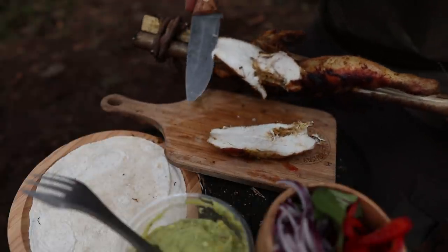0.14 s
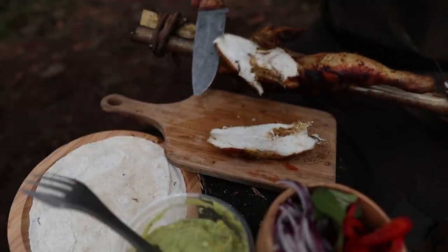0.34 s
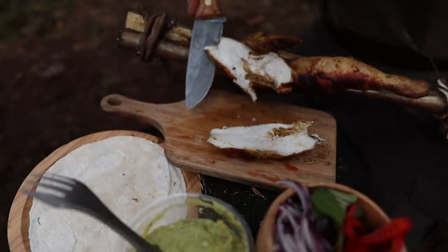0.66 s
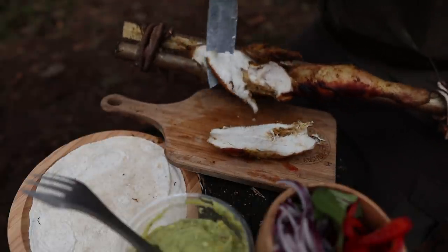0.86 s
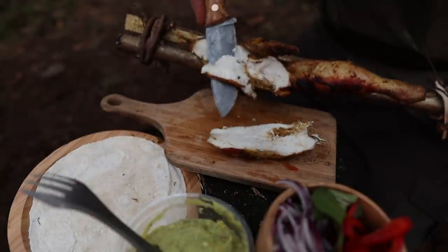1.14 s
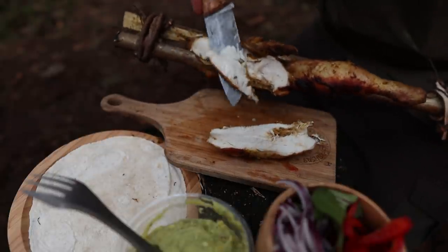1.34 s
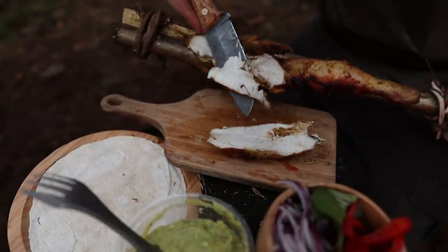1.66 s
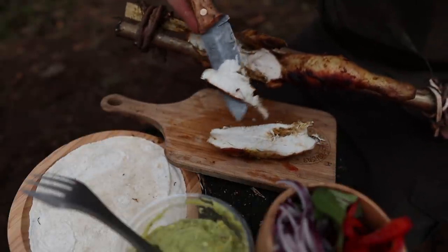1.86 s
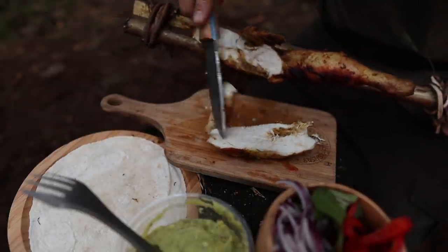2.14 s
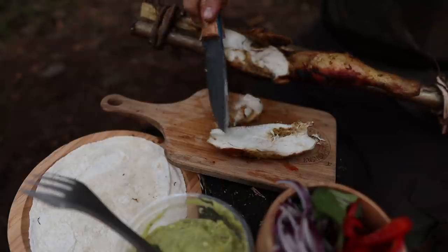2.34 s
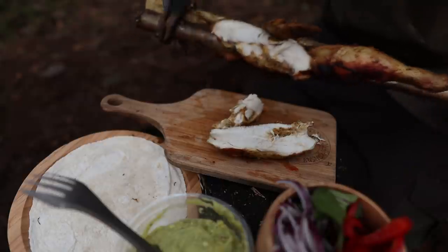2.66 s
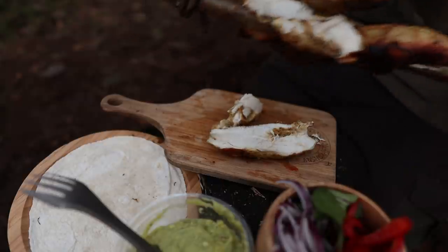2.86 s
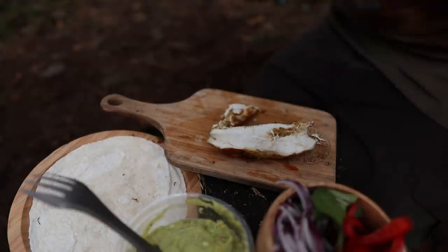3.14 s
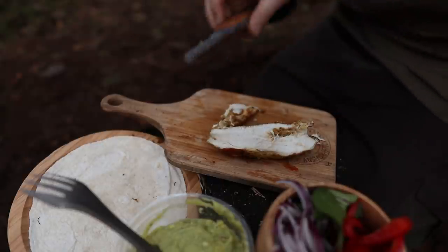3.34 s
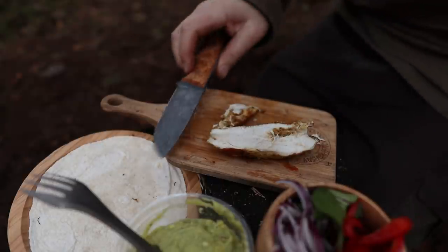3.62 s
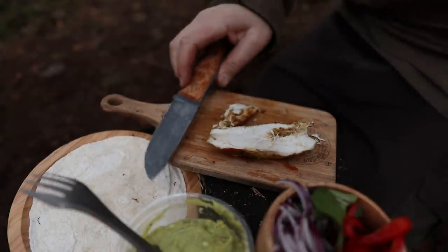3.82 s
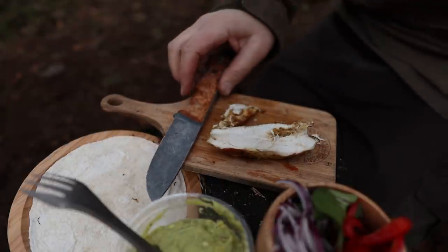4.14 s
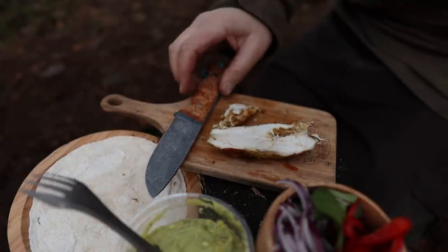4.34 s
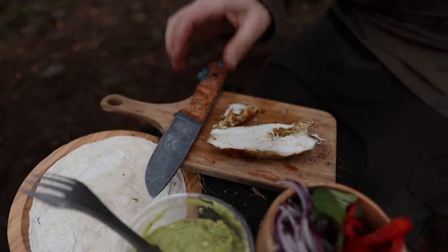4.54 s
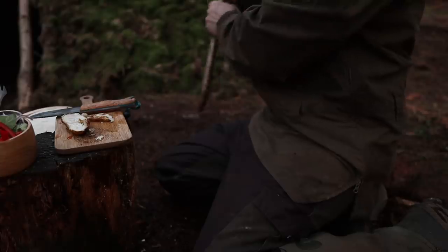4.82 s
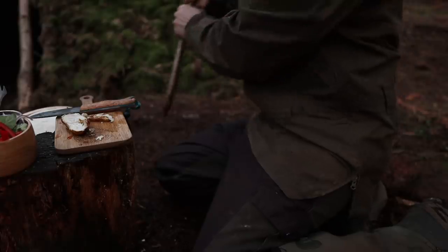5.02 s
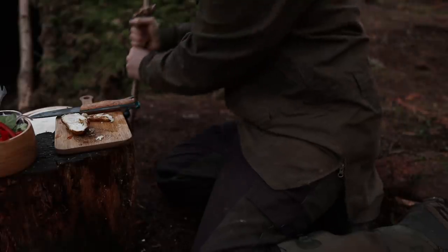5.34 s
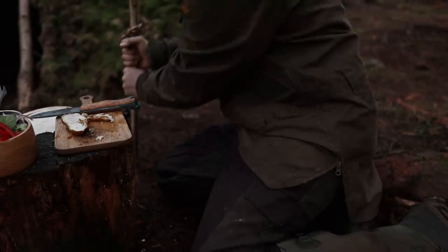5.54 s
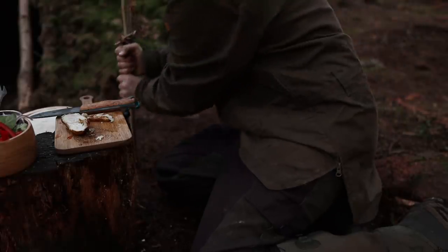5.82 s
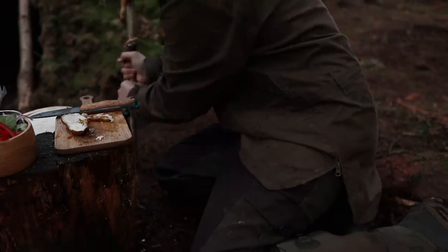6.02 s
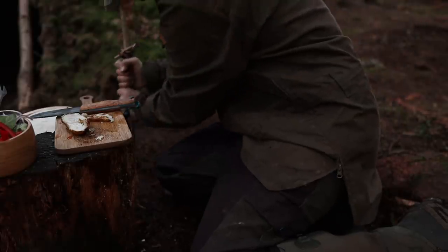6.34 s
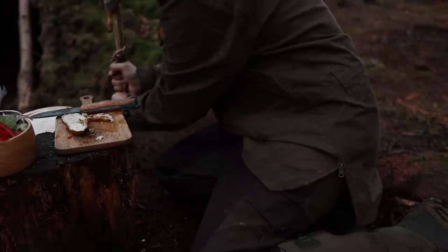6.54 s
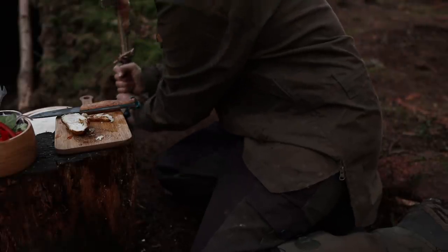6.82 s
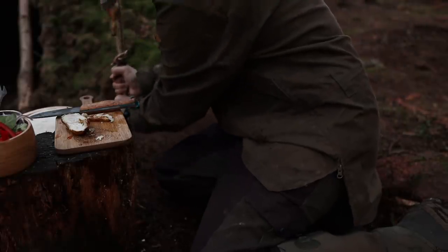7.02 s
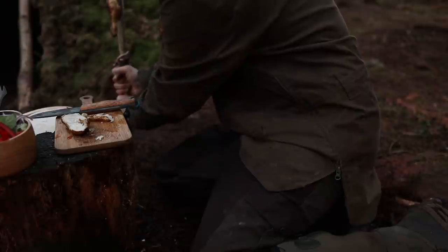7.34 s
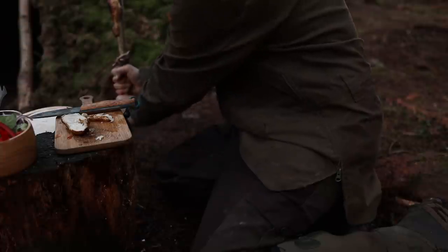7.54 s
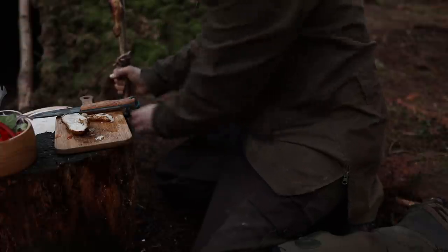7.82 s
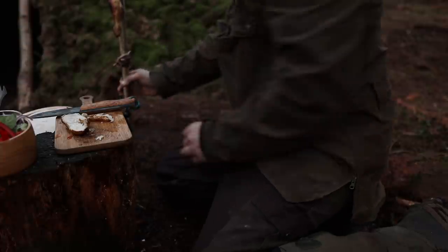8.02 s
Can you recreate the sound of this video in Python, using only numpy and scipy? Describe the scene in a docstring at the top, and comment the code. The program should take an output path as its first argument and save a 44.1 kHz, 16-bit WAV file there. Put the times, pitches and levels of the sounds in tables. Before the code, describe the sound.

Close to the microphone outdoors, a knife rubs through roast meat with a soft wet fizz and small snaps of crisp skin, over a low, pulsing hum. The knife is set on a wooden board with a loud knock and rocks briefly to rest. The hum drops away, a jacket rustles, and twigs crack as a wooden spit is pushed into the ground.

```python
"""A low, beating hum in the open air and, close to the microphone, roast chicken carved off a wooden spit.
The meat hisses and clicks wetly as its fibres part; the knife is laid on the board and rocks to rest.
The hum drops away, a jacket rustles, and twigs crack as the spit is pushed into the ground.
One microphone takes it all, with only a weak scatter from the stump, the dishes and the trees."""
import sys
import numpy as np
from scipy import signal
from scipy.fft import rfft, irfft, next_fast_len
from scipy.io import wavfile
from scipy.ndimage import uniform_filter1d

SR = 44100
rng = np.random.default_rng(int(sys.argv[2]) if len(sys.argv) > 2 else 0)


def to_wav(sig):
    """Store sig (one row per channel, or 1-D mono) as 16-bit WAV at the path in sys.argv[1].

    Samples outside -1..1 are clipped; the rate is SR.
    """
    pcm = np.clip(np.atleast_2d(sig), -1, 1) * 32767
    pcm = np.round(pcm).astype(np.int16)
    wavfile.write(sys.argv[1], SR, pcm.T)  # frames by channels


N = 360736
TIME = np.arange(N) / SR

# blade strokes, until the slice slides off and settles: t/s, length/s, relative rub/dB, relative fizz/dB
STROKES = [(-0.03, .18, -68, -49.5), (.21, 0.44, -50, -56), (.62, 0.3, -48.5, -57), (.85, 0.13, -54, -45),
           (1.04, 0.19, -64, -54), (1.27, 0.068, -55, -43), (1.45, 0.25, -48.5, -50.5),
           (1.71, 0.088, -49.5, -49), (1.98, 0.38, -47, -46.5), (2.55, 0.74, -53, -55.5),
           (3.08, 0.32, -50, -56)]
# moves of the arms and body: t/s, length/s, relative cloth/dB, relative swish/dB
MOVES = [(3.15, 0.54, -52.5, -67), (4.63, 0.22, -54.5, -66), (4.765, 0.051, -42, -48.5),
         (4.82, 0.62, -44, -51), (5.45, 0.34, -55, -64), (5.76, 0.41, -49, -55.5), (6.28, 0.14, -51, -60),
         (6.45, 0.24, -52.5, -58.5), (6.8, 0.17, -52.5, -57.5), (7.11, .11, -46.5, -51),
         (7.38, .38, -50.5, -60.5), (7.79, .12, -46.5, -51.5), (7.89, 0.16, -42, -45.5),
         (8.05, 0.11, -37.5, -38)]


def amp(db):
    """Decibels to gain."""
    return 10 ** (np.asarray(db) / 20)


def unit(x):
    """Scales to an rms of one."""
    return x / np.sqrt(np.mean(x ** 2) + 1e-20)


def add(mix, s, sound):
    """Mixes a sound in at s seconds."""
    part = mix[round(s * SR):][:len(sound)]
    part += sound[:len(part)]


def spectrum_db(points, size):
    """Reads a spectrum (f/Hz, level/dB) at the bins of an FFT of this size."""
    hz, db = np.transpose(points)
    return np.interp(np.log(np.fft.rfftfreq(size, 1 / SR) + 1), np.log(hz), db)


def coloured(x, points):
    """Gives x a spectrum, at an rms of one."""
    size = next_fast_len(len(x))
    return unit(irfft(rfft(x, size) * amp(spectrum_db(points, size)), size)[:len(x)])


def causal(db):
    """The shortest pulse with this spectrum: abrupt start, ringing afterwards."""
    log_gain = np.log(amp(np.r_[db, db[-2:0:-1]]))
    return np.fft.ifft(np.exp(np.conj(signal.hilbert(log_gain)))).real


def passed(x, hz, kind, order=2):
    """Low-pass or high-pass."""
    return signal.sosfilt(signal.butter(order, min(hz, SR / 2 - 100), kind, fs=SR, output="sos"), x)


def drift(hz):
    """Random wander, mostly slower than hz, at an rms of one."""
    rolloff = np.exp(-(np.fft.rfftfreq(N, 1 / SR) / hz) ** 2)
    return unit(irfft(rfft(rng.standard_normal(N)) * rolloff, N))


def grains(per_s, spread_db, smooth):
    """Countless tiny slips of uneven size over a smooth hiss."""
    sizes = amp(spread_db * np.minimum(rng.exponential(1, N), 4)) * rng.choice([-1, 1], N)
    slipping = rng.random(N) < per_s / SR
    return unit(sizes * slipping) + smooth * rng.standard_normal(N)


def efforts(movements, rise_share, sag_db, release_s):
    """Gains of dull and bright friction: movements gather speed, ease, die away, and add in power."""
    power = np.zeros((2, N))
    for s, length, *levels_db in movements:
        t = np.maximum(TIME - s, 0)
        attack = np.sin(np.pi / 2 * np.minimum(t / (rise_share * length), 1))
        sag = amp(-sag_db * np.minimum(t / length, 1))
        release = np.exp(-np.maximum(t - length, 0) / release_s)
        power += (amp(levels_db)[:, None] * attack * sag * release) ** 2
    return np.sqrt(power)


def hum_and_air(hum_end_s=4.775, fade_s=0.012):
    """Two close tones beat eleven times a second, then give way to a faint drone in the open air."""
    # tones of the hum: f/Hz, rms level/dB
    hum_tones = [(88.7, -48), (99.7, -53), (174.6, -62), (177.4, -69.5), (199.7, -68), (299.5, -65.5)]
    # spectra of the air, the rumble under the hum and the drone after it: f/Hz, relative level/dB
    air_spectrum = [(15, -41), (25, -10), (38, -18.5), (70, 0), (92, -2), (137, 0), (277, -3.5),
                    (439, -5.5), (1040, -10), (3160, -16.5), (7710, -16), (10400, -22.5), (13200, -20),
                    (15000, -28), (16200, -44)]
    rumble_spectrum = [(30, -7), (70, -21), (120, -2.5), (280, -6.5), (450, -21.5), (1100, -13.5),
                       (1600, -32.5)]
    drone_spectrum = [(40, -15), (65, -1), (95, 5), (115, -5), (260, -7.5), (500, -41)]
    hum = sum(amp(db) * unit(np.sin(2 * np.pi * (hz * TIME + rng.random()))) for hz, db in hum_tones)
    air = amp(-53.5) * coloured(rng.standard_normal(N), air_spectrum)
    rumble = amp(-57) * coloured(rng.standard_normal(N), rumble_spectrum)
    drone = amp(-56.5) * coloured(rng.standard_normal(N), drone_spectrum)
    running = np.clip((hum_end_s - TIME) / fade_s, 0, 1)
    return air + running * (hum + rumble) + (1 - running) * drone


def carving():
    """Close up, the blade rubs through the meat while moist fibres part in a fine fizz and juices pop."""
    # spectra of the dull rub and the wet fizz: f/Hz, relative level/dB
    rub_spectrum = [(150, -16), (400, 1), (1100, -1.5), (1800, -3.5), (3500, -10.5), (7000, -32)]
    fizz_spectrum = [(1500, -4), (3500, -6), (5500, -3.5), (7200, -6), (8500, -2), (10000, -12),
                     (13500, -7.5), (16000, -16)]
    rub = coloured(grains(per_s=2500, spread_db=5, smooth=1), rub_spectrum) * amp(-6.5 + 0.55 * drift(25))
    fizz = coloured(grains(per_s=570, spread_db=17, smooth=1.5), fizz_spectrum) * amp(drift(40))
    pops = amp(-1) * coloured(juices(per_s=2500, pop_t60=0.0041), fizz_spectrum)
    wet = amp(-3) * squelched(fizz + pops, depth_db=2.2)
    rubbing, parting = efforts(STROKES, rise_share=0.14, sag_db=1.5, release_s=0.068)
    return rub * rubbing + wet * parting


def juices(per_s, pop_t60, pitches=24):
    """Tiny wet pops, each size of pocket at its own pitch, coming in clumps."""
    out, t = np.zeros(N), np.arange(512) / SR
    clump_times = np.linspace(0, TIME[-1], 140)
    for hz in np.geomspace(3000, 14000, pitches):
        pop = np.sin(2 * np.pi * hz * t) * amp(-60 * t / pop_t60)
        clumps = amp(np.interp(TIME, clump_times, 4 * rng.standard_normal(len(clump_times))))
        sizes = rng.uniform(-0.78, 1, N) * (rng.random(N) < per_s / pitches / SR)
        out += signal.oaconvolve(sizes * clumps, pop)[:N]
    return out


def squelched(x, depth_db):
    """Moist pockets open and close, each favouring a narrow band for a moment."""
    spectra = signal.stft(x, nperseg=512)[2]
    pockets = uniform_filter1d(rng.standard_normal(spectra.shape), size=11, axis=0)  # across frequency
    pockets = uniform_filter1d(pockets, size=12, axis=1)  # across time
    return unit(signal.istft(spectra * amp(depth_db * unit(pockets)), nperseg=512)[1][:N])


def skin_snaps():
    """Fibres and bits of crisp skin snap: some loud, many weak ones during the strokes."""
    # the louder snaps: t/s, strength/dB, centre f/Hz, relative crumble/dB
    loud = [(.1146, -10.5, 4670, -7), (.4757, -12, 10700, -17), (.4934, -15, 8700, -18),
            (.5842, -12, 10000, -16), (.6178, -8.5, 7070, -19), (.803, -13, 4700, -3),
            (1.8915, -20.5, 5600, -25), (2.606, 1.5, 5180, -4), (2.6075, -1.5, 5460, 2),
            (2.6905, -16, 7770, -13), (2.778, -16, 2720, 12), (2.9622, -22, 13900, -11),
            (2.993, -13.5, 6900, 5), (3.1063, -17.5, 6100, -17), (3.122, -11.5, 8100, -31),
            (3.3002, -12.5, 4870, 3), (3.344, -16, 6230, -1), (3.575, -13, 5000, -15),
            (3.617, -13.5, 4930, -24), (3.763, -13.5, 5750, 4), (3.8413, -18.5, 5440, -21),
            (4.5384, -20, 6350, -2), (4.6748, -16.5, 7200, -8)]
    # spectrum of a snap as heard through the microphone: f/Hz, relative level/dB
    spectrum = [(300, -22), (1200, -7.5), (3000, -8.5), (5000, -5), (8200, -5), (10500, -7.5),
                (16000, -11.5)]
    weak = small_breaks(STROKES, per_s=20, db=-22.5, spread_db=6.5,
                        centre_hz=6500, octaves=1.16, crumble_db=-16)
    return cracks([*loud, *weak], spectrum, focus_db=3.1, crumble_t60=0.012, lag_s=0.00098)


def small_breaks(movements, per_s, db, spread_db, centre_hz, octaves, crumble_db, count=600):
    """Rows for the weak cracks that fall at random while a movement lasts."""
    when, luck, weakness, pitch = rng.random((count, 4)).T
    s = when * N / SR
    moving = np.any([(s > start) & (s < start + length) for start, length, *_ in movements], axis=0)
    hz = centre_hz * 2 ** (octaves * (pitch - 0.5))
    rows = np.c_[s, db - spread_db * weakness, hz, np.full(count, crumble_db)]
    return rows[moving & (luck < per_s * N / SR / count)]


def cracks(rows, spectrum, focus_db, crumble_t60, lag_s, size=4096):
    """Each is a sharp break and a few milliseconds of smaller ones, coloured by the piece that breaks."""
    out, t = np.zeros(N), np.arange(size) / SR
    hz = np.fft.rfftfreq(size, 1 / SR) + 200
    for s, db, centre_hz, crumble_db in rows:
        resonances_db = 3 * unit(uniform_filter1d(rng.standard_normal(len(hz)), size=60))
        off_centre_db = focus_db * np.log2(hz / centre_hz) ** 2
        pulse = causal(spectrum_db(spectrum, size) + resonances_db - off_centre_db)
        splinters = unit(rng.standard_normal(size) ** 3)  # mostly tiny, a few large
        crumble = splinters * amp(crumble_db - 60 * t / crumble_t60)
        crack = signal.fftconvolve((t == 0) + crumble, pulse)[:size]
        add(out, s + lag_s, amp(db) * crack / np.linalg.norm(crack))
    return out


def squishes(width_hz=370):
    """Meat squishes and wood creaks: quick runs of tiny slips, each through one resonance."""
    # squishes and creaks: t/s, length/s, level/dB, centre f/Hz
    runs = [(0.379, 0.052, -54, 9170), (1.03, 0.17, -61, 8100), (1.148, 0.065, -49, 5800),
            (2.772, 0.024, -52, 2470), (2.893, 0.035, -56, 8240), (6.482, .012, -49, 2900),
            (6.503, 0.0075, -47, 2820), (6.542, 0.058, -50, 7850)]
    out, slips = np.zeros(N), grains(per_s=180, spread_db=0, smooth=0.26)
    for s, length, db, hz in runs:
        resonance = signal.iirpeak(hz, hz / width_hz, fs=SR)
        squish = signal.lfilter(*resonance, slips[round(s * SR):][:round(length * SR)])
        add(out, s, amp(db) * unit(squish) * signal.windows.tukey(len(squish), 0.5))
    return out


def blade_scrapes():
    """The edge drags on wood; its quick, uneven slips set the blade ringing."""
    # drags of the edge: t/s, length/s, level/dB, low-pass f/Hz
    drags = [(0.903, 0.033, -38, 9000), (0.92, 0.028, -36.5, 1700), (0.979, 0.035, -38.5, 7000),
             (0.994, 0.028, -37.5, 1500), (4.08, 0.094, -48, 7000), (4.177, 0.055, -39, 8000),
             (4.311, 0.055, -44.5, 4500)]
    # modes of the blade alone: f/Hz, relative level/dB, t60/s
    blade_modes = [(247, -15, 0.053), (1225, -1, 0.068), (1405, -10.5, 0.071), (1700, -9.5, 0.048),
                   (2290, -3.5, 0.009), (3010, -2.5, 0.02), (3420, -2.5, 0.034), (3580, -12, .03),
                   (4660, -11, 0.058), (6100, -2, 0.0155), (7260, -5, .012)]
    out, slips = np.zeros(N), grains(per_s=550, spread_db=9.5, smooth=0.92)
    blade = ringing(blade_modes, t60_factor=1.1, place=0)
    rasp = unit(signal.oaconvolve(slips, blade)[:N]) + 0.38 * unit(slips)
    for s, length, db, high_hz in drags:
        scrape = passed(rasp[round(s * SR):][:round(length * SR)], high_hz, "low")
        add(out, s, amp(db) * unit(scrape) * signal.windows.tukey(len(scrape), 0.5))
    return out


def ringing(modes, t60_factor, place, size=8192):
    """Decaying modes; the place that is struck favours some of them over others."""
    out, t = np.zeros(size), np.arange(size) / SR
    for k, (hz, db, t60) in enumerate(modes):
        favour = (-1) ** (k // 2) * amp(4 * np.cos(np.pi * k * place))
        out += favour * amp(db - 60 * t / (t60 * t60_factor)) * np.sin(2 * np.pi * hz * t)
    return out


def knife_knocks(rebounds=3, first_gap_s=0.015, gap_factor=0.45, loss_db=5.5):
    """A light touch ticks, the knife's full weight knocks; ever quicker, weaker rebounds follow."""
    # the knife taps and is set down: t/s, peak/dB, high-pass f/Hz, low-pass f/Hz, factor on t60,
    # relative crack/dB, place along the blade (0-1), relative first rebound/dB
    blows = [(2.607, -25, 2900, 4500, 1.8, -20, 0.16, -30), (4.0429, 6.5, 670, 5850, 0.83, -10, 0.16, -25),
             (4.0503, -20, 530, 7300, 0.43, -7.5, 0.43, -10),
             (4.0797, -11, 390, 2800, 1.1, -8, 0.14, -11.5), (4.1738, -7, 1370, 2940, 0.77, -4, 0.15, -27),
             (4.1988, -9, 2300, 3300, 1.05, -10, 0.3, -24), (4.207, -4, 220, 1160, 0.91, 0, 0.65, -22),
             (4.36, -0.9, 250, 1400, 1, 6.5, 0.86, -16), (4.4154, -6, 300, 1240, 0.84, 4, 0.68, -35),
             (4.471, -35, 150, 647, .7, -6, 0.46, -14)]
    out = np.zeros(N)
    for s, db, low_hz, high_hz, t60_factor, crack_db, place, rebound_db in blows:
        add(out, s, amp(db) * knife_contact(low_hz, high_hz, t60_factor, crack_db, place))
        for k in range(rebounds):
            s += first_gap_s * gap_factor ** k
            rebound = knife_contact(low_hz=350, high_hz=1100, t60_factor=0.41, crack_db=-3, place=place)
            add(out, s, amp(db + rebound_db - k * loss_db) * rebound)
    return out


def knife_contact(low_hz, high_hz, t60_factor, crack_db, place, size=8192):
    """One touch of knife and board, with a peak of one: a crack and the modes it sets ringing."""
    # modes of the knife against the board: f/Hz, relative level/dB, t60/s
    knife_modes = [(274, -21, 0.12), (406, -41, 0.1), (582, -16, 0.09), (770, -6.5, 0.039),
                   (894, -9, 0.047), (987, 0, 0.03), (1190, -17.5, 0.027), (1264, 5, 0.037),
                   (1745, -16, 0.076), (2000, -4, 0.02), (2290, -1, 0.011), (2500, -8.5, 0.029),
                   (3110, -4.5, 0.015), (3310, -5, 0.022), (3610, -0.5, 0.0094), (4040, -19, 0.031),
                   (4520, -5, 0.019), (4740, -13, 0.031), (5820, -11.5, 0.028), (7650, -34, 0.034)]
    t = np.arange(size) / SR
    body = ringing(knife_modes, t60_factor, place)
    crack = 0.73 * (t == 0) + 0.21 * rng.standard_normal(size) * amp(-60 * t / 0.032)
    blow = body / abs(body).max() + amp(crack_db) * crack
    blow = passed(passed(blow, low_hz, "high"), high_hz, "low")
    return blow / abs(blow).max()


def soft_bumps():
    """Wood and earth meet in dull, heavily damped contacts, a few cycles long."""
    # bumps: t/s, level/dB, f/Hz, t60/s
    bumps = [(2.958, -36, 490, 0.022), (3.460, -21, 400, 0.015), (3.507, -21.5, 610, 0.0097),
             (4.9315, -22, 585, 0.024), (6.168, -33, 480, 0.019), (6.842, -35, 287, 0.034),
             (8.0875, -6.5, 575, 0.0064)]
    return thumps(bumps, overtone_gain=0.45)


def thumps(rows, overtone_gain, overtone_ratio=1.525, attack_s=0.00083, size=12288):
    """Each contact starts a damped low swing with one inharmonic overtone."""
    out, t = np.zeros(N), np.arange(size) / SR
    attack = 1 - np.exp(-t / attack_s)
    for s, db, hz, t60 in rows:
        phase = 2 * np.pi * hz * t
        swing = np.sin(phase) + overtone_gain * np.sin(overtone_ratio * phase)
        add(out, s, swing * attack * amp(db - 60 * t / t60))
    return out


def jacket_rustle():
    """Cloth slides on cloth and swishes over dry litter as the carver moves."""
    # spectra of the cloth and the bright swish: f/Hz, relative level/dB
    cloth_spectrum = [(100, -10), (250, -5), (500, 1.5), (1300, 0.5), (2200, -2), (3500, -10),
                      (6000, -26.5)]
    swish_spectrum = [(1500, -15), (3200, -1), (5000, -5.5), (7000, -6), (8500, -3.5), (10000, -17.5),
                      (13500, -12), (16000, -30)]
    slips = grains(per_s=1600, spread_db=4, smooth=1.5) * amp(1.85 * drift(37))
    litter = grains(per_s=1000, spread_db=12.5, smooth=1.74)
    cloth = amp(0.23) * coloured(slips, cloth_spectrum)
    swish = amp(0.5) * coloured(litter, swish_spectrum)
    sliding, brushing = efforts(MOVES, rise_share=0.31, sag_db=1, release_s=0.11)
    return cloth * sliding + swish * brushing


def twig_cracks():
    """Litter crackles as the body moves, and twigs break under the spit and the knees."""
    # the louder twigs: t/s, strength/dB, centre f/Hz, relative crumble/dB
    loud = [(4.9018, -0.5, 2350, 8), (5.433, -17, 6000, -11), (5.784, -21, 2500, -12),
            (5.832, -19, 5000, -14), (5.988, -18.5, 1990, -21), (6.072, -14.5, 1500, -19),
            (6.1513, -4, 2400, -20), (6.167, -5.5, 1300, -16), (6.186, -12.5, 1600, -23),
            (6.225, -14, 2170, -30), (6.2927, -0.5, 5750, -15), (6.349, -18, 2500, 0),
            (6.392, -17, 2000, 0), (6.451, -17, 3500, -11), (6.5705, -8.5, 2900, -24),
            (6.674, -9, 2160, -16), (6.697, -17.5, 6500, -20), (6.841, -13.5, 1950, -28),
            (6.852, -14, 2200, -5), (7.298, -18.5, 7500, -13)]
    # spectrum of a twig crack as heard through the microphone, which adds a peak near 8.3 kHz
    # and a dip near 10.5 kHz: f/Hz, relative level/dB
    spectrum = [(150, 7), (500, 8), (1400, 3.5), (3200, -0.5), (5500, 0.5), (8300, 4), (10500, -2),
                (16000, -0.5)]
    weak = small_breaks(MOVES, per_s=20, db=-23, spread_db=3, centre_hz=3760, octaves=3.1, crumble_db=-11)
    return cracks([*loud, *weak], spectrum, focus_db=2.5, crumble_t60=0.018, lag_s=0.001103)


def board_thuds():
    """The board rocks on the stump under the knife's heavier blows."""
    # thuds: t/s, level/dB, f/Hz, t60/s
    thuds = [(4.0429, -17.5, 71.6, 0.019), (4.207, -27.5, 270, 0.11), (4.225, -35.5, 133, 0.257),
             (4.361, -22.5, 393, 0.082), (4.385, -30, 80, 0.45), (4.416, -17, 285, 0.027)]
    return thumps(thuds, overtone_gain=0.37)


def surroundings(direct, scatter_db=-34, t60=0.12, delay_s=0.003, size=16384):
    """A weak, short scatter from the stump, the dishes and the trees follows the direct sound."""
    t = np.arange(size) / SR
    tail = passed(rng.standard_normal(size), 6000, "low") * amp(-60 * t / t60) * (t > delay_s)
    return direct + amp(scatter_db) * signal.oaconvolve(direct, tail / np.linalg.norm(tail))[:N]


def scene():
    """One microphone outdoors, close to the spit, heard alike in both ears."""
    friction = carving() + squishes() + jacket_rustle()
    knife = knife_knocks() + blade_scrapes() + board_thuds()
    impacts = knife + skin_snaps() + twig_cracks() + soft_bumps()
    mono = surroundings(impacts) + friction + hum_and_air()
    return np.array([mono, mono])


def record(dry):
    """The hardest knock overloads the microphone input; a steep low-pass takes off the top treble."""
    clipped = np.clip(dry, -1, 1)
    band_limit = signal.firwin(401, cutoff=16150, window=("kaiser", 9), fs=SR)
    return signal.oaconvolve(clipped, band_limit[None], "same")


dry = scene()
out = record(dry)
to_wav(out)
```